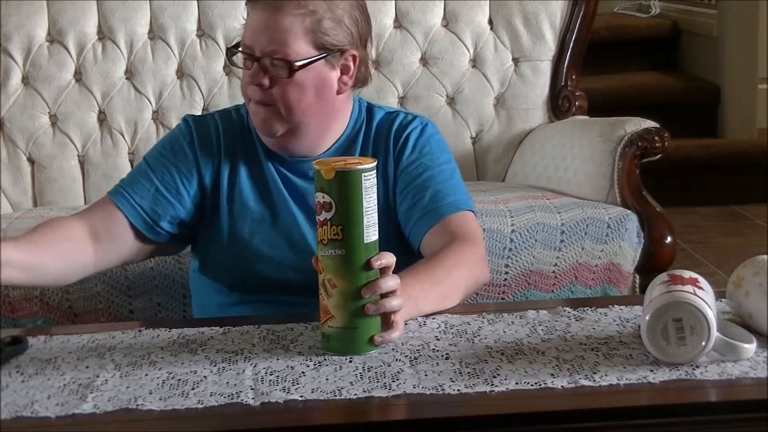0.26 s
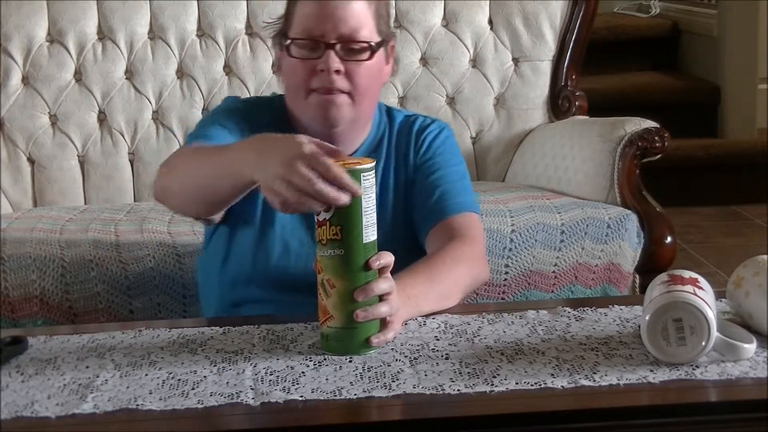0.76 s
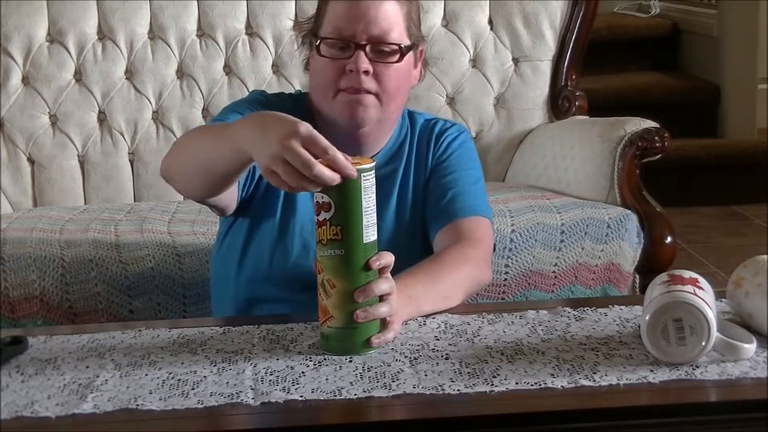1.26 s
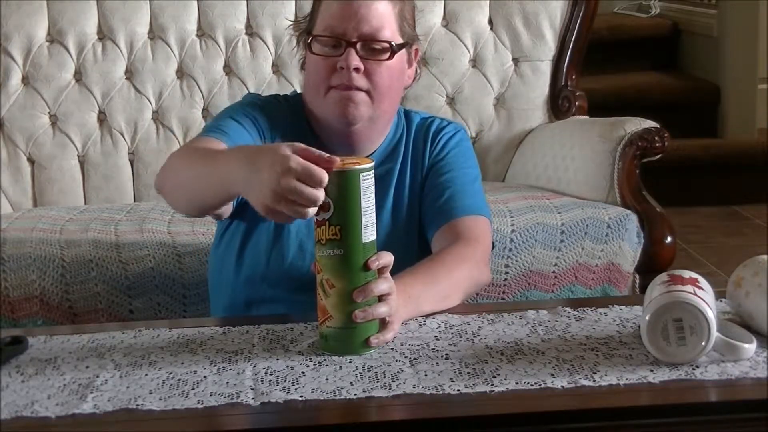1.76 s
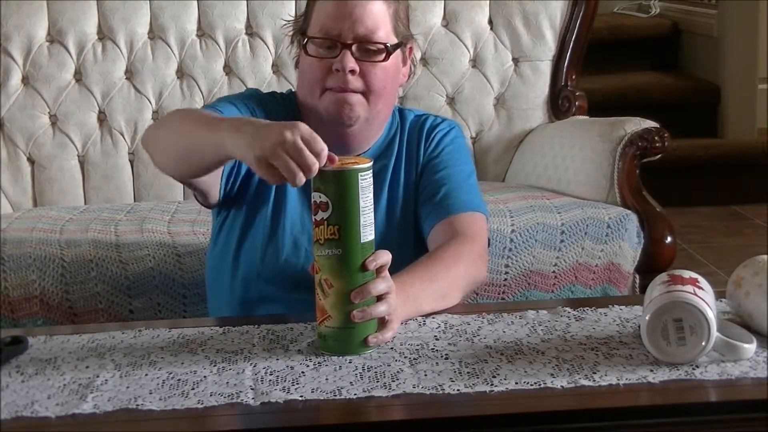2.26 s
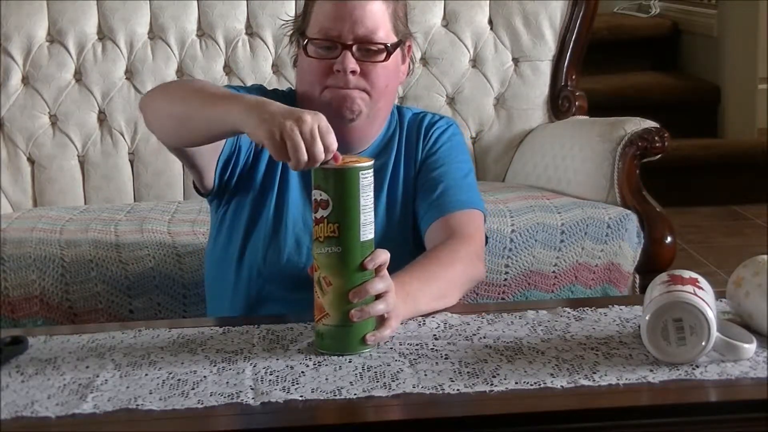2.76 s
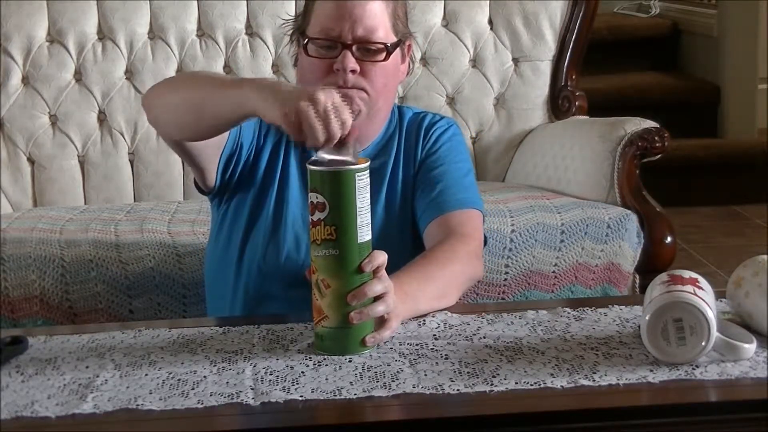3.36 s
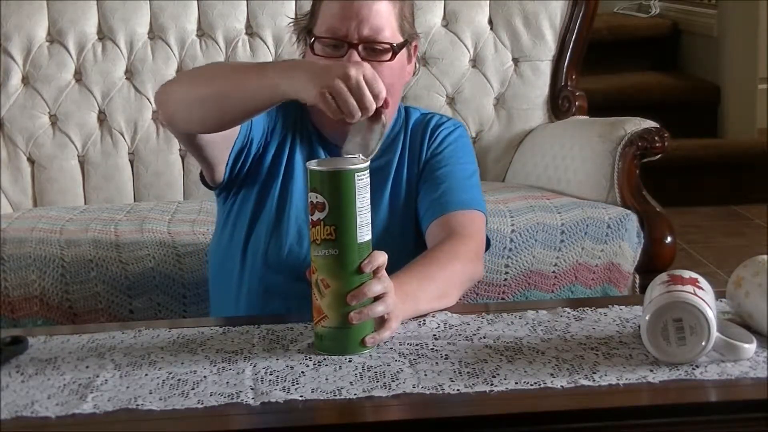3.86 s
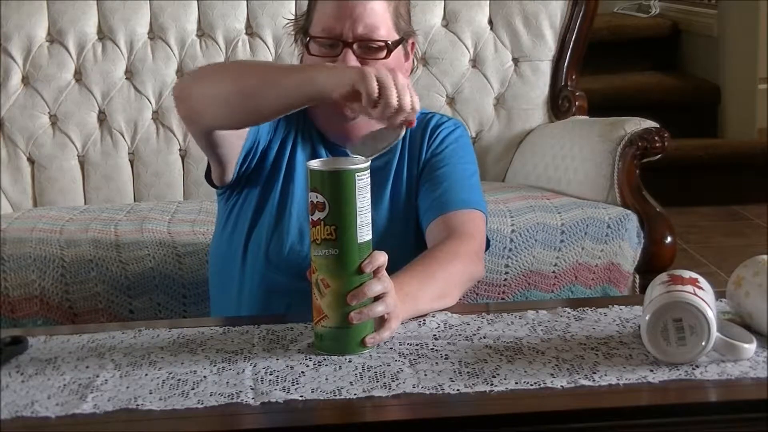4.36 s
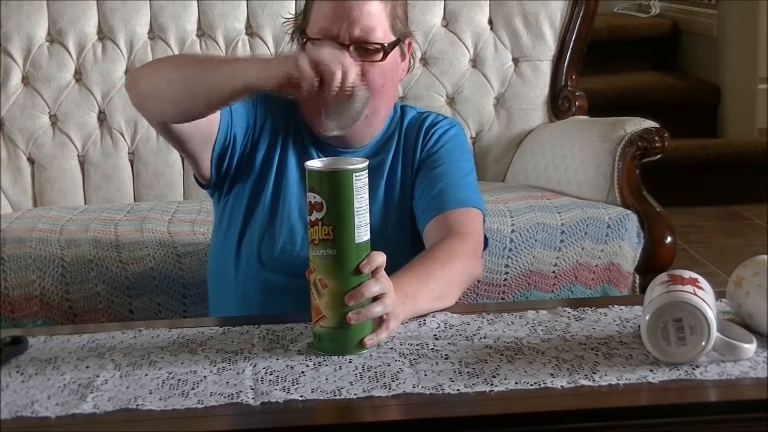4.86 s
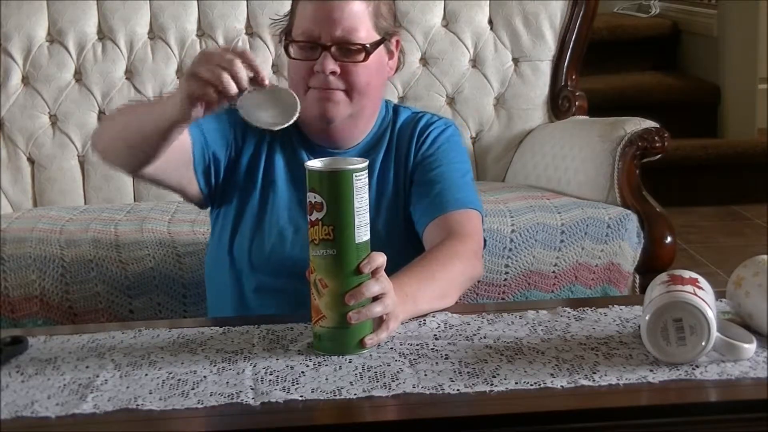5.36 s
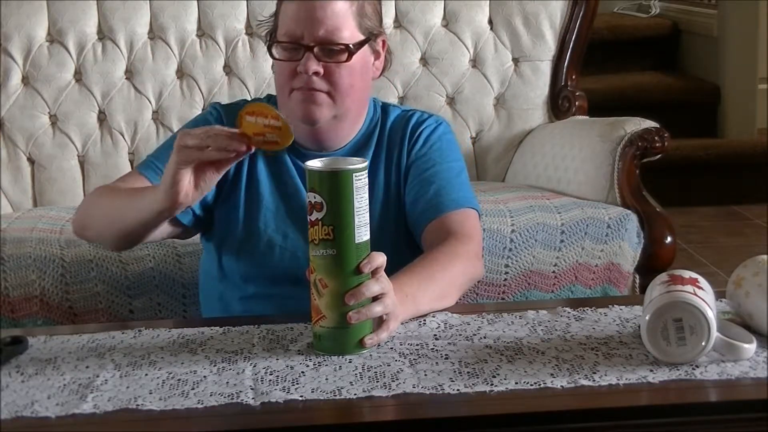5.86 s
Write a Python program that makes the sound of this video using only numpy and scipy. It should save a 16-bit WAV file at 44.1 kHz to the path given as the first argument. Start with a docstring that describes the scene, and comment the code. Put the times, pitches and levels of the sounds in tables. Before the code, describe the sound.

A plastic lid clacks onto a table, then a snack can's foil seal is picked with sharp clicks and ripped off in a quiet room.

```python
"""Opening a snack can

Over microphone hiss and mains hum, a plastic lid clacks onto a table in a quiet, hard-floored living room.
Fingers brush and pick at the foil seal of a tall cardboard can, then tear it off in jerks, pushing the can
onto the table. Each snap cracks the foil, rings the taut seal, knocks the wall and thumps the air in the
tube; the room answers with a long tail."""
import sys
import numpy as np
from scipy import signal
from scipy.fft import rfft, irfft, next_fast_len
from scipy.io import wavfile
from scipy.ndimage import uniform_filter1d

SR = 44100
rng = np.random.default_rng(int(sys.argv[2]) if len(sys.argv) > 2 else 0)


def master_out(mix):
    """Clip the mix to full scale and print it as 16-bit PCM to the path in sys.argv[1]."""
    frames = np.transpose(np.atleast_2d(mix))
    ceiling = np.clip(frames, -1, 1)
    pcm = np.round(ceiling * 32767).astype(np.int16)
    wavfile.write(sys.argv[1], SR, pcm)


N = 269406


def amp(db):
    return 10 ** (np.asarray(db) / 20)


def unit(x):
    return x / np.sqrt(np.mean(x ** 2) + 1e-20)


def along(points, hz):
    """Read a curve of (f/Hz, value) points on a log axis."""
    f, v = np.transpose(points)
    return np.interp(np.log(hz + 1), np.log(f + 1), v)


def filtered(x, response):
    """Play x through a complex frequency response."""
    m = next_fast_len(x.shape[-1] + SR // 2)
    return irfft(rfft(x, m) * response(np.fft.rfftfreq(m, 1 / SR)), m)[..., :x.shape[-1]]


def modes(rows):
    """A resonant body: band-passes of alternating polarity."""
    return lambda hz: sum((-1) ** k * amp(db) * 1j * hz * width / (f * f - hz * hz + 1j * hz * width)
                          for k, (f, width, db) in enumerate(rows))


def causal(points):
    """A minimum-phase EQ through these points."""
    def response(hz):
        cepstrum = irfft(np.log(amp(along(points, hz))))
        cepstrum[1:len(hz)] *= 2
        cepstrum[len(hz):] = 0
        return np.exp(rfft(cepstrum))
    return response


def blows(times, db, length_s):
    """One clean push at each time; the longer, the duller."""
    out = np.zeros(N)
    np.add.at(out, np.round(times * SR).astype(int), amp(db) * rng.choice([-1, 1], len(times)))
    push = np.hanning(round(length_s * SR) + 3)
    return signal.fftconvolve(out, push / push.sum())[:N]


def bursts(times, db, t60):
    """A sharp hit at each time that crumbles into a short rattle."""
    out, t = np.zeros(N + SR), np.arange(600) / SR
    hits = amp(-60 * t / t60) * rng.standard_normal((len(times), len(t)))
    hits /= np.linalg.norm(hits, axis=1, keepdims=True)
    for s, gain, hit in zip(times, amp(db), hits):
        out[round(s * SR):][:len(t)] += gain * hit
    return out[:N]


def crackle(per_s, spread_db):
    """Random slips of uneven size, rms 1."""
    slips = rng.random(N) < per_s / SR
    return unit(slips * rng.standard_normal(N) * amp(spread_db * rng.exponential(size=N)))


def crumbs(count, spread_s):
    """Smeared clicks of even colour, their bands scattered over spread_s."""
    knots = rng.random((count, 12))
    lag = spread_s * np.array([np.interp(np.linspace(0, 11, 257), range(12), k) for k in knots])
    return irfft(np.exp(-2j * np.pi * np.cumsum(lag, axis=1) * SR / 512))


def swells(times, attack_s, release_s, levels, rise_db, fall_db):
    """Envelope of strokes that ramp by rise_db to their level, sink fall_db and stop."""
    out = np.zeros(N)
    for s, up, down, db in zip(times, attack_s, release_s, levels):
        i = np.arange(round((s - up) * SR), round((s + down) * SR))
        out[i] += amp(db + np.interp(i / SR, [s - up, s, s + down], [-rise_db, 0, -fall_db]))
    return np.abs(uniform_filter1d(out, size=200))


# hiss colour, mid and side: f/Hz, level/dB
MID_HISS_EQ = [(20, -20), (60, -19.5), (150, -8.5), (350, -5), (700, -8), (1700, -14), (6000, -19),
               (15000, -26.5), (15900, -50), (17000, -70)]
SIDE_HISS_EQ = [(20, -34), (100, -7.5), (260, -2.5), (630, -5), (2700, -17.5), (14800, -30.5), (15900, -44),
                (17000, -76)]
# mains tone: f/Hz, mid level/dB, side level/dB
MAINS_HUM = [(118, -69.5, -81)]


def room_tone():
    """A wide bed of microphone hiss and distant room air, with mains hum."""
    t = np.arange(N) / SR
    hiss = lambda eq: unit(filtered(rng.standard_normal(N), lambda hz: amp(along(eq, hz))))
    mid, side = amp(-60) * hiss(MID_HISS_EQ), amp(-57) * hiss(SIDE_HISS_EQ)
    for hz, mid_db, side_db in MAINS_HUM:
        hum = np.sin(2 * np.pi * hz * t)
        mid += amp(mid_db) * hum
        side += amp(side_db) * hum
    return np.array([mid + side, mid - side])


# lid landing: t/s, level/dB, rattle offset/dB, wood offset/dB
LID_HITS = [(0.133, -29, -55, -22), (0.168, -38, -15, -13.5), (0.175, -51, -12, -9),
            (0.207, -51.5, -15, -28), (0.275, -44, -27, -1)]
# ring of the lid and of the wood under it: f/Hz, width/Hz, level/dB
LID_MODES = [(568, 40, 6), (1004, 120, -3), (1430, 220, -3), (2190, 480, -5.5), (3100, 680, -11)]
WOOD_MODES = [(169, 6.7, 2.5), (365, 36, 7.5)]
# bright rim rattle: f/Hz, level/dB
RIM_EQ = [(800, -50), (2500, 9.5), (4000, 9), (8000, 2), (12000, 0), (16500, -25)]


def lid():
    """The plastic lid clacks, knocks the wood and rattles its rim."""
    s, db, rattle_db, wood_db = np.transpose(LID_HITS)
    clack = filtered(blows(s, db + 35, length_s=0.000088), modes(LID_MODES))
    knock = filtered(blows(s, db + wood_db + 44, length_s=0.0021), modes(WOOD_MODES))
    rattle = filtered(bursts(s, db + rattle_db + 35.5, t60=0.054), causal(RIM_EQ))
    return clack + knock + rattle


# finger strokes: t/s, attack/s, release/s, level/dB
STROKES = [(.8, 0.021, 0.26, -55), (1.15, 0.047, 0.029, -55), (1.27, .05, 0.22, -56.5),
           (1.447, .004, 0.3, -57), (1.73, 0.06, 0.26, -54.5), (5.07, 0.0093, .07, -57.5),
           (5.51, 0.063, 0.022, -61.5), (5.64, 0.046, 0.019, -62.5)]
# skin on foil: f/Hz, level/dB
SKIN_EQ = [(500, -5), (2000, -3.5), (6000, -13), (10000, -8), (13000, -16), (16500, -28)]


def fingers():
    """Fingertips brush the foil: dense tiny slips make a fine, dry rustle."""
    envelope = swells(*np.transpose(STROKES), rise_db=-1, fall_db=7.5)
    return envelope * filtered(crackle(per_s=13000, spread_db=-1), causal(SKIN_EQ))


def patch(hz, centre_hz, width_hz):
    """Colour of a foil patch that rings for a few cycles and moves too little air for bass."""
    low_cut = np.clip(hz / centre_hz, 0, 1)
    return low_cut * hz * width_hz / np.hypot(centre_hz ** 2 - hz ** 2, hz * width_hz)


# crinkle of the foil sheet and sizzle of its sharp edge: f/Hz, level/dB
FOIL_EQ = [(800, -50), (2200, 3.5), (3300, -4), (5000, -4), (6500, -9), (9000, -17), (16500, -59.5)]
EDGE_EQ = [(2000, -56.5), (5500, -17), (8000, -5.5), (10000, -5), (13000, -10.5), (16500, -38)]
# ring of the taut seal: f/Hz, width/Hz, level/dB
SEAL_MODES = [(1169, 107, -0.5), (1653, 155, -3), (2160, 490, -4), (2360, 580, -7), (3270, 880, -15.5)]
OPENS_S, POP_SHUT_HZ, POP_OPEN_HZ = 3.05, 1620, 1165  # the seal slackens once it is torn


def foil_cracks(times, db, edge_db, ring_db):
    """The foil gives way in tiny ragged tears: one click each, coloured by five layers."""
    out, hz = np.zeros(N + SR), np.fft.rfftfreq(4096, 1 / SR)
    seal = np.abs(modes(SEAL_MODES)(hz)) / (1 + (hz / 3200) ** 4)
    pop_hz = np.where(times < OPENS_S, POP_SHUT_HZ, POP_OPEN_HZ)
    pop_hz = pop_hz * np.exp(0.06 * rng.standard_normal(len(times)))
    clicks = crumbs(len(times), spread_s=0.00092)
    for s, gain, edge, ring, pop, click in zip(times, amp(db), edge_db, ring_db, pop_hz, clicks):
        # the smaller the loosened patch, the higher its tick and the less it rings the seal
        tick_hz = 3050 * 2 ** np.clip(-ring / 39, -.5, 1)
        layers = [amp(17.5 + along(FOIL_EQ, hz)) * np.clip(hz / (0.79 * tick_hz), 0, 1) ** 2,
                  amp(edge + 25.5 + along(EDGE_EQ, hz)),
                  amp(16) * patch(hz, tick_hz, width_hz=740),
                  amp(ring + 30) * patch(hz, pop, width_hz=760) ** 2,  # a larger patch springs loose
                  amp(ring + 31.5) * seal]
        colour_db = 10 * np.log10(np.sum(np.square(layers), axis=0))
        colour = causal(np.transpose([hz, colour_db]))(hz)
        out[round(s * SR):][:4096] += gain * irfft(rfft(click, 4096) * colour)
    return out[:N]


# air in the can, shut and open: f/Hz, width/Hz, level/dB
SHUT_MODES = [(203, 62, -7.5), (368, 41, 0), (439.4, 25, -11)]
OPEN_MODES = [(211.5, 22.5, 1.5), (253, 44, -3), (343, 81, -7.5)]


def tube_air(drive):
    """The air column thumps, muted while shut; it only sings its low note through a gap."""
    shut = np.arange(N) < OPENS_S * SR
    # the narrow gap radiates no deep bass
    vented = lambda hz: modes(OPEN_MODES)(hz) * (1j * hz / (150 + 1j * hz)) ** 2
    return amp(-10.5) * filtered(drive * shut, modes(SHUT_MODES)) + filtered(drive * ~shut, vented)


# nail picking foil: t/s, level/dB, edge offset/dB, ring offset/dB, knock offset/dB
NAIL_SNAPS = [(0.9252, -28.5, -21, -1, -19), (1.287, -52, -12, -3, -21), (1.447, -44.5, -7, -7, -18),
              (1.6152, -26.5, -4.5, -23.5, -20), (2.0175, -18, -13, -10.5, -24), (2.13, -46, -31, 2.5, 2),
              (2.396, -27, -14.5, 3.5, -11.5), (2.4205, -24, -11, 1, -32), (2.427, -30.5, -1, -16, 1.5),
              (2.5193, -31, -24, -1.5, -21), (2.5701, -18, -11, -6, -16.5), (2.708, -36, -26, 10.5, -4.5),
              (2.7253, -25, -31, -5.5, -16.5), (2.7892, -38.5, -9, -10, -15), (2.8308, -32, -20, 1, -13),
              (2.8628, -18, -9, -8, -14.5), (3.0342, -24.5, -21, 2, -13), (3.063, -20.5, -11, -5, -6.5),
              (3.1196, -11.5, -6.5, -23, -36), (3.1336, -13.5, -20.5, -38, -25),
              (3.1571, -14.5, -8.5, -10, -8), (3.4385, -23, -31, -6, -7), (3.5974, -35.5, -8, -9, -18.5),
              (3.629, -17.5, -1, -12.5, -40), (3.6844, -19, 1, -8, -11), (3.6967, -13, -14, -27.5, -43),
              (4.0551, -33.5, -18, -6.5, -29), (4.2225, -53, -20, 8, 0.5), (4.2444, -37.5, -13, -4, -12),
              (4.3473, -50, -19, 3.5, -1), (4.414, -39, -9.5, -11, -17.5),
              (4.496, -24.5, -5.5, -20.5, -19.5), (4.517, -30.5, -11, -6.5, -8.5),
              (4.8493, -19.5, -13, -36.5, -5.5)]
# cardboard wall: f/Hz, width/Hz, level/dB
WALL_MODES = [(455.7, 120, -16), (779, 182, -4.5)]


def snaps():
    """Each snap cracks the foil, knocks the wall and thumps the air inside."""
    s, db, edge_db, ring_db, knock_db = np.transpose(NAIL_SNAPS)
    cracks = foil_cracks(s, db, edge_db, ring_db)
    knock = filtered(blows(s, db + knock_db + 44.5, length_s=0.0014), modes(WALL_MODES))
    thump = tube_air(blows(s, db + 2.05 * knock_db + 49.5, length_s=0.0015))  # grows faster than the knock
    return cracks + knock + thump


# can pushed onto the table: t/s, level/dB
CAN_PUSHES = [(2.442, -37), (3.075, -38), (3.42, -35.5), (3.65, -39), (4.869, -32.5)]
# low note of the table top: f/Hz, width/Hz, level/dB
TABLE_MODES = [(79, 6.5, -6)]


def table_thuds():
    """The table top booms softly under each push."""
    s, db = np.transpose(CAN_PUSHES)
    return filtered(blows(s, db + 39, length_s=0.0049), modes(TABLE_MODES))


# jerks on the seal: t/s, attack/s, release/s, level/dB, seal offset/dB, wall offset/dB, tube offset/dB
JERKS = [(3.061, 0.0076, 0.032, -20.5, -11, -1.5, -5), (3.162, 0.0046, 0.052, -20, -7, -12.5, -18),
         (3.444, 0.082, 0.024, -27.5, -6, -6, -13.5), (3.621, 0.026, 0.0072, -30.5, -4, 0.5, -18),
         (3.635, 0.0077, 0.031, -17, -1, -12, -21), (3.691, 0.0024, 0.043, -24, -0.5, -11.5, -30),
         (3.899, .025, 0.15, -41.5, -4, -12, -13), (4.06, 0.0025, 0.025, -51, -3, 3.5, -18),
         (4.25, 0.024, 0.053, -52.5, 8.5, 4, 3.5), (4.376, 0.046, 0.011, -55, -4, 9.5, 0),
         (4.52, .003, 0.038, -41, -10, -6, -18), (4.815, .025, 0.033, -32.5, -2.5, -2.5, -1.5),
         (4.856, 0.0048, 0.084, -46, 8.5, 8, -6)]


def tearing(rise_db=7, fall_db=9.5, body_share=0.73):
    """The glue line rips in jerks; its slips drive foil, seal, wall and the air in the tube."""
    *timing, db, seal_db, wall_db, tube_db = np.transpose(JERKS)
    # seal, wall and tube follow only a share of each jerk's swing
    body = lambda offset_db: swells(*timing, db + offset_db, body_share * rise_db, body_share * fall_db)
    rip = swells(*timing, db, rise_db, fall_db) * crackle(per_s=1800, spread_db=5)
    foil = amp(-4) * filtered(rip, causal(FOIL_EQ)) + amp(-6.5) * filtered(rip, causal(EDGE_EQ))
    seal = filtered(body(seal_db + 5.5) * crackle(per_s=2500, spread_db=1.7), modes(SEAL_MODES))
    wall = filtered(body(wall_db + 9) * crackle(per_s=1300, spread_db=-0.5), modes(WALL_MODES))
    air = tube_air(body(tube_db + 19) * crackle(per_s=600, spread_db=3.5))
    return foil + seal + wall + air


# bounces off table, sofa and walls: t/s, level/dB
REFLECTIONS = [(.002, -4.5), (.007, -13.5), (0.0101, -9.5), (0.014, -18), (.022, -8), (.027, -11)]


def early_room(x):
    """The direct sound and first reflections, smeared by soft, uneven surfaces."""
    path = np.zeros(SR // 20)
    path[0] = 1
    for (s, db), smear in zip(REFLECTIONS, crumbs(len(REFLECTIONS), spread_s=0.00111)):
        path[round(s * SR):][:len(smear)] += amp(db) * smear
    return signal.fftconvolve(x, path)[:N]


# reverb time: f/Hz, t60/s
ROOM_DECAY = [(150, 0.54), (400, 0.58), (1000, 0.6), (2800, 0.57), (7000, 0.47), (14000, 0.33)]
# stereo image of the tail: f/Hz, left-right likeness (1 = mono)
TAIL_LIKENESS = [(60, 0.17), (240, 0.97), (950, 0.96), (3770, 0.82), (15000, 0.073)]
# colour that sofa and carpet leave in the tail: f/Hz, level/dB
TAIL_EQ = [(150, -0.5), (500, 1.5), (2000, 1), (6000, 4), (14000, -3.5)]


def room_tail(x, build_s):
    """Diffuse reverb, each band dying at its own speed; twelve random tails alternate to keep it smooth."""
    block, size, out = 2048, 2 ** 16, np.zeros((2, N + 2 * SR))
    patterns = []
    for _ in range(12):
        hz, t, noise = signal.stft(rng.standard_normal((2, SR * 3 // 4)), SR, nperseg=256)
        decay = amp(-60 * t / along(ROOM_DECAY, hz)[:, None])
        tail = signal.istft(noise * decay, SR, nperseg=256)[1]
        tail *= 1 - np.exp(-np.arange(tail.shape[1]) / SR / build_s)
        patterns.append(rfft(tail / np.linalg.norm(tail[0]), size))
    for k, start in enumerate(range(0, N, block)):
        out[:, start:start + size] += irfft(rfft(x[start:start + block], size) * patterns[k % 12])

    def colour_and_width(hz):
        angle = np.arccos(along(TAIL_LIKENESS, hz)) / 2
        return amp(along(TAIL_EQ, hz)) * [np.cos(angle), np.sin(angle)]
    mid, side = filtered(out[:, :N], colour_and_width)
    return np.array([mid + side, mid - side])


# pan by band: f/Hz, left minus right level/dB
PAN = [(80, -0.5), (240, 5), (950, 3), (3800, 1), (15000, 1.4)]


def scene(flight_s=0.001):
    """The mix: the can stands a little left of the microphone, over the room tone."""
    props = lid() + fingers() + snaps() + table_thuds() + tearing()
    near = np.pad(props, (round(flight_s * SR), 0))[:N]
    heard = amp(4.5) * early_room(near) + amp(6) * room_tail(near, build_s=0.0016)
    panned = filtered(heard, lambda hz: amp(np.outer([.5, -.5], along(PAN, hz))))
    return panned + room_tone()


def record(dry, low_cut_hz=45, top_hz=16700):
    """The microphone is deaf to the deepest bass; a hard band limit cuts the top."""
    return filtered(dry, lambda hz: (1j * hz / (low_cut_hz + 1j * hz)) ** 2 * (hz < top_hz))


dry = scene()
out = record(dry)
master_out(out)
```